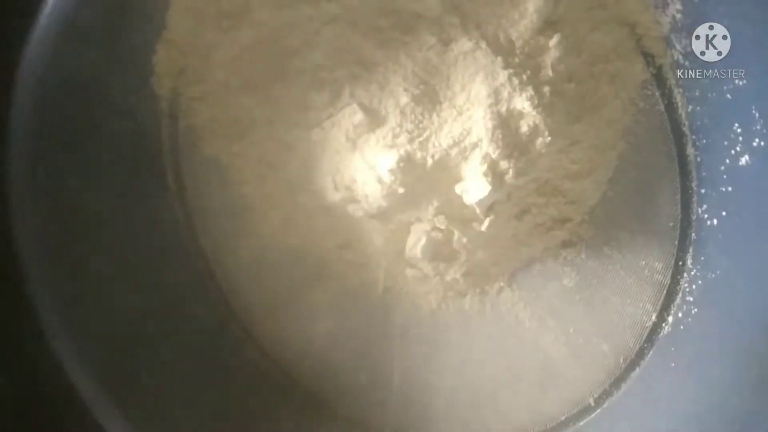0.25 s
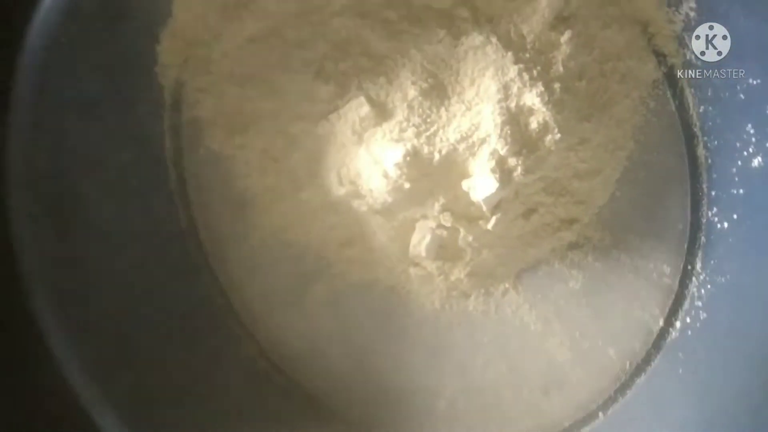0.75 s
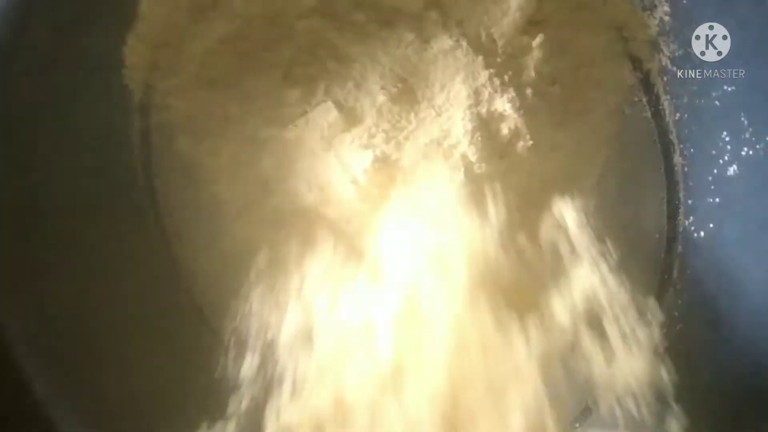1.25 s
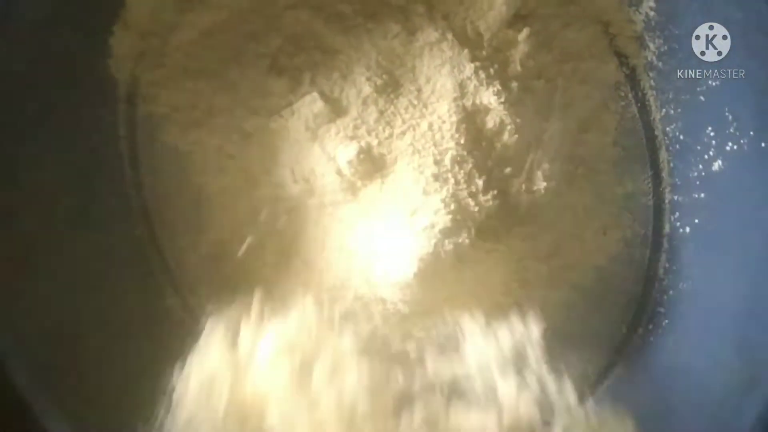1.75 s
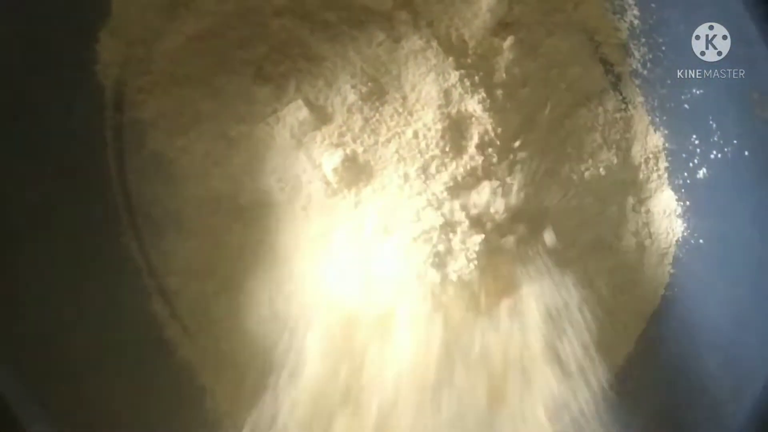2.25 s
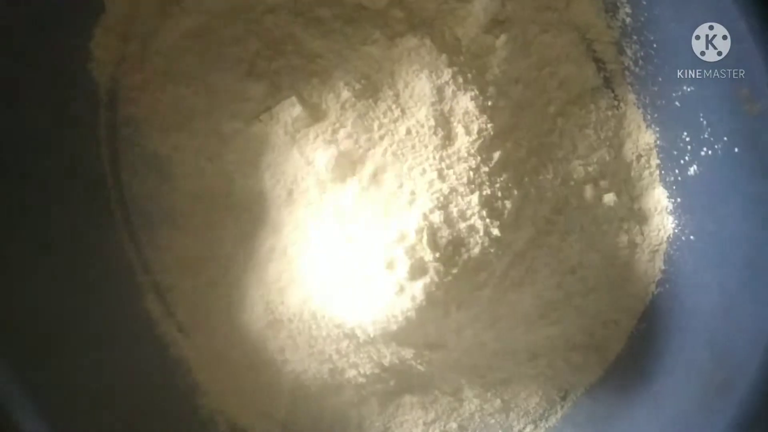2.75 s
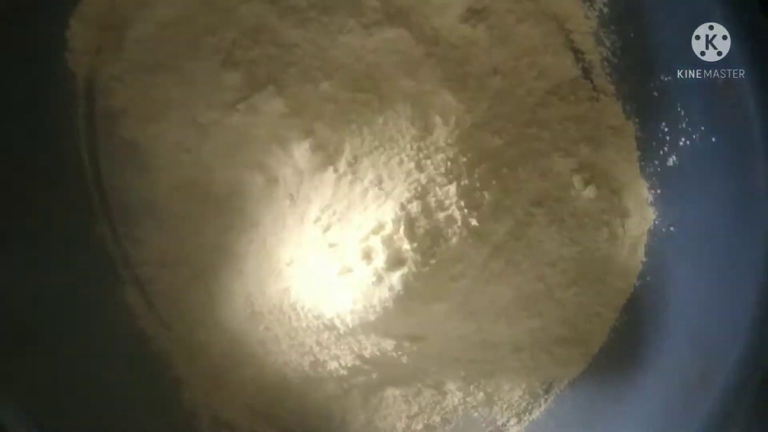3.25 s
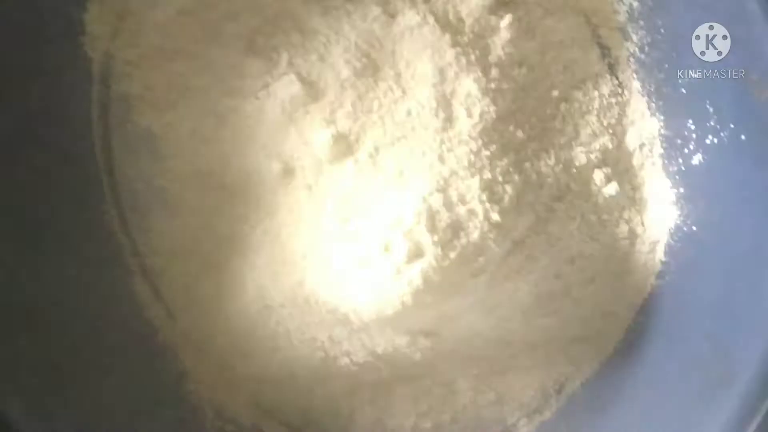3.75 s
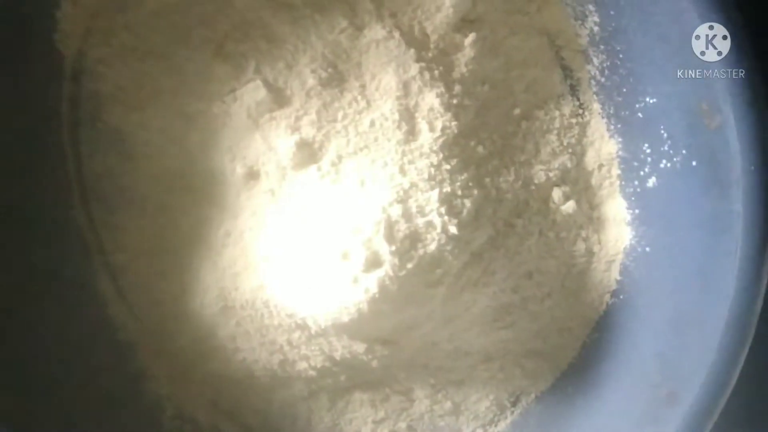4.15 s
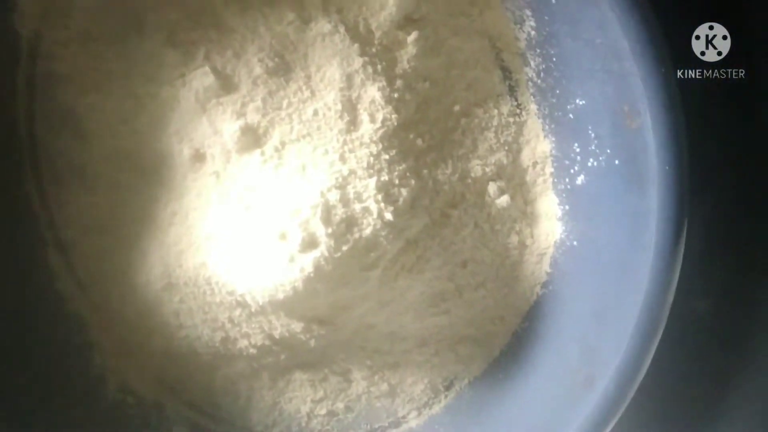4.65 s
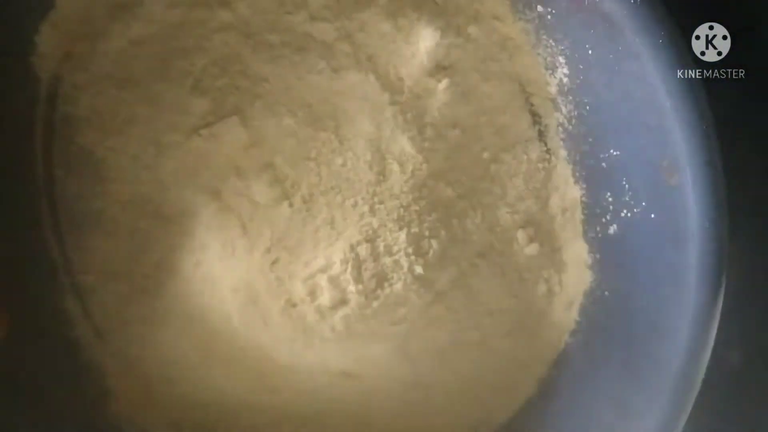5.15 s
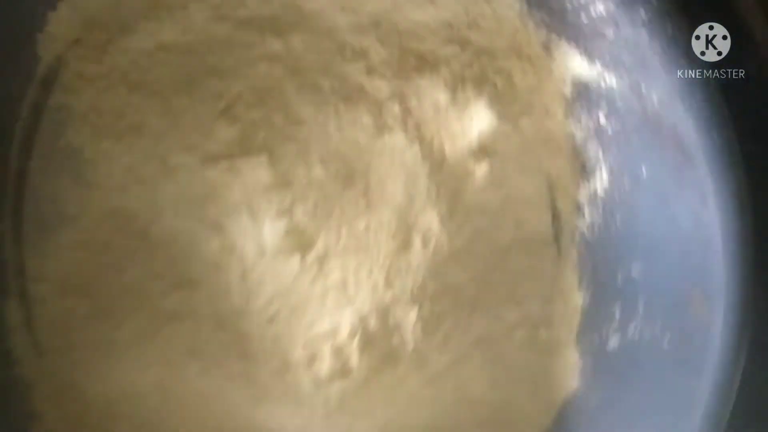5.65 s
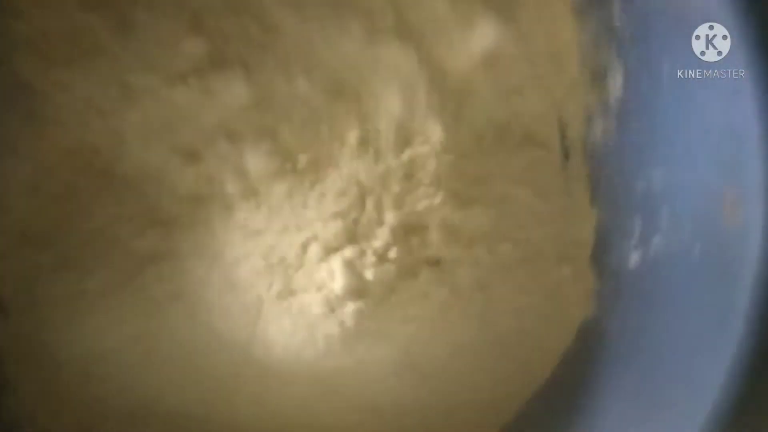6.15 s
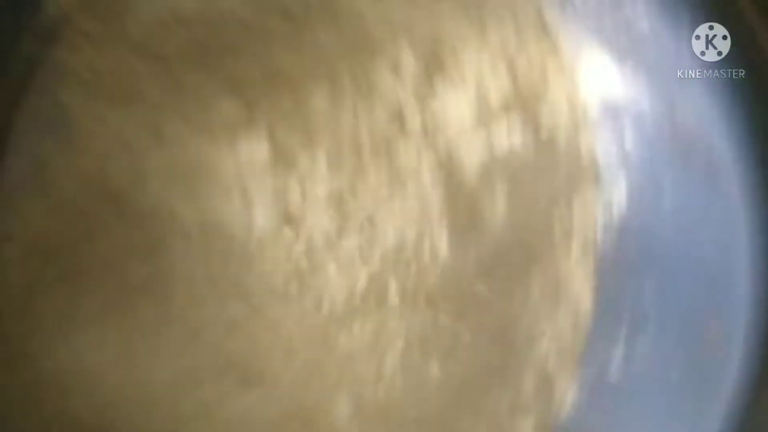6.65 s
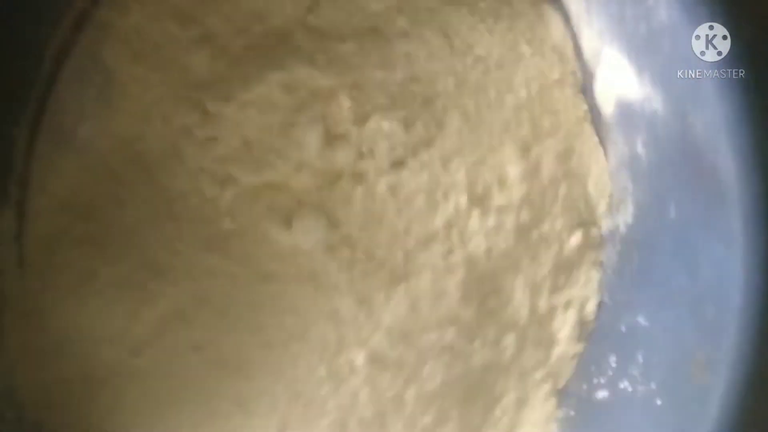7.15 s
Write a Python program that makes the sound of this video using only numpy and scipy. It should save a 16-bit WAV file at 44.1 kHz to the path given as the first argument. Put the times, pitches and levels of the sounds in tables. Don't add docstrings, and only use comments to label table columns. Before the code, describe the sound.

Close above a steel bowl in a small home kitchen, flour falls in soft, dry hissing bursts over a low fan hum. The bowl takes one loud hollow knock, stutters and scrapes along the counter, and turns. Thin metallic squeaks follow, then a sieve clunks onto the rim and rattles briefly. Finally, gentle quick shakes rustle flour through the mesh, with faint taps.

```python
import sys
import numpy as np
from scipy import signal
from scipy.fft import rfft, irfft
from scipy.io import wavfile
from scipy.ndimage import uniform_filter1d

SR = 44100
rng = np.random.default_rng(int(sys.argv[2]) if len(sys.argv) > 2 else 0)


def volts(x):
    e = np.asarray(x, float) / 20
    return 10 ** e


def int16_out(signal):
    q = np.round(np.clip(np.atleast_2d(signal).T, -1, 1) * 32767)
    wavfile.write(sys.argv[1], SR, q.astype(np.int16))


N = 326003
T = np.arange(N) / SR
HZ = np.maximum(np.fft.rfftfreq(N, 1 / SR), 1)
SIDES = np.array([[.5], [-.5]])


def unit(x):
    return x / np.sqrt(np.mean(x ** 2))


def across(table):
    hz, value = np.transpose(table)
    return np.interp(np.log(HZ), np.log(hz), value)


def walk(rate):
    k = int(SR / rate)
    held = np.repeat(rng.standard_normal(N // k + 1), k)
    return 1.33 * uniform_filter1d(uniform_filter1d(held, k), k)[:N]


def slide(s, rise, fall):
    return np.exp(-.5 * ((T - s) / np.where(T < s, rise, fall)) ** 2)


def grains(rate, scatter_db):
    k = int(SR / rate)
    sizes = volts(scatter_db * rng.exponential(size=N // k + 1))
    return np.repeat(sizes, k)[:N]


# (frequency [Hz], common share [0-1])
PORT_LIKENESS = [(60, 0.79), (300, 0.95), (500, 1), (900, 0.15), (2500, 0.22), (6000, 0.02)]


def noise(gain, lead_s, grain=1.):
    common, left, right = rfft(grain * rng.standard_normal((3, N)))
    like = np.clip(across(PORT_LIKENESS), 0, 1)
    lead = np.exp(2j * np.pi * HZ * lead_s)
    left = np.sqrt(like) * common * lead + np.sqrt(1 - like) * left
    right = np.sqrt(like) * common + np.sqrt(1 - like) * right
    return unit(irfft(np.array([left, right]) * gain, N))


def ring(x, modes):
    y = 0
    for k, (hz, db, t60) in enumerate(modes):
        pole = np.exp((2j * np.pi * hz - np.log(1000) / t60) / SR)
        y = y + (-1) ** k * volts(db) * signal.lfilter([1], [1, -pole], x).imag
    radiates = signal.butter(3, .8 * modes[0][0], "high", fs=SR, output="sos")
    return signal.sosfilt(radiates, y)


def kitchen(x, wet_db, t60):
    t = T[:int(SR * t60)]
    tail = rng.standard_normal((2, len(t))) * volts(-60 * t / t60) * (1 - np.exp(-t / 0.0023))
    tail *= volts(wet_db) / np.sqrt(np.sum(tail ** 2) / 2)
    return x + signal.fftconvolve(x, tail, axes=1)[:, :N]


def bands(table, flicker_db):
    colour = volts(across(table))
    out = 0
    for octave in np.arange(4, 14.5, .5):
        band = colour * np.sqrt(np.clip(1 - np.abs(np.log2(HZ) - octave) * 2, 0, 1))
        power = np.sum(band ** 2)
        out = out + volts(flicker_db * walk(6)) * np.sqrt(power) * noise(band, -0.00032)
    return unit(out)


# (time [s], rumble level [dB])
FAN_DRAUGHT = [(0.0, -44.5), (1.07, -43), (1.38, -42), (1.81, -43.5), (4.0, -43.5), (4.45, -43),
               (5.25, -43.5), (5.43, -40), (5.84, -43.5), (7.39, -43.5)]
# (frequency [Hz], level [dB per Hz])
FAN_RUMBLE = [(15, -83), (25, -99), (97, -37), (162, -9.5), (271, -8.5), (297, -9), (332, -7), (370, -2.5),
              (487, -7), (771, -14), (1030, -13), (1240, -15.5), (2000, -22), (2600, -66), (4400, -120)]
# (frequency [Hz], level [dB per Hz])
FAR_HISS = [(1290, -15.5), (2200, -1), (2790, -3.5), (3180, -4.5), (3420, -5), (6570, -13), (15500, -15.5)]


def room_air():
    blade_hz, width_hz, blade_db, far_db = 308.7, 10.6, -5, -10
    rumble_db = np.interp(T, *np.transpose(FAN_DRAUGHT))
    blade = noise(1 / (1 + ((HZ - blade_hz) / width_hz) ** 2), 0.)
    far = unit(noise(volts(across(FAR_HISS)), -0.000386) * volts(1.14 * walk(6.4)))
    fan = bands(FAN_RUMBLE, 0.57) + volts(blade_db) * blade
    return volts(rumble_db) * fan + volts(rumble_db + far_db) * far


# (time [s], level [dB])
COUNTER_BUMPS = [
    (1.4, -48),
    (4.68, -48),
    (5.325, -23),
    (5.515, -39),
    (7.375, -52),
]
# (frequency [Hz], level [dB], t60 [s])
COUNTER_MODES = [(30, 2, .12), (58, -10, 0.084), (96, -3, .1)]


def bumps():
    push = sum(volts(db) * slide(s, 0.0022, 0.0022) for s, db in COUNTER_BUMPS) / (0.01 * SR)
    return ring(push, COUNTER_MODES)


# (start [s], length [s], frequency [Hz], level [dB])
SQUEAK_PULSES = [(4.575, .06, 2800, -59), (4.65, .05, 2790, -58), (4.735, .022, 2905, -50),
                 (4.754, .022, 2890, -46.5), (4.776, .024, 2900, -52), (4.815, .054, 2890, -44),
                 (4.868, .034, 2915, -57), (4.902, .034, 2950, -47.5), (4.934, .024, 2950, -51),
                 (4.958, .034, 2950, -50.5), (5.0, .05, 2955, -47.5), (5.06, .02, 2920, -56),
                 (5.09, .024, 2945, -49.5), (5.115, .022, 2935, -50.5), (5.17, .025, 2940, -56),
                 (5.206, .03, 2895, -48.5), (5.238, .024, 2900, -55), (5.288, .028, 2900, -54),
                 (4.73, .6, 2915, -62)]


def squeak():
    wobble_hz, stutter_db = 16, 2.3
    start, length, hz, db = np.transpose(SQUEAK_PULSES)
    size = 0
    for s, w, d in zip(start, length, db):
        size = size + volts(d) * np.clip(1 - (2 * (T - s) / w - 1) ** 4, 0, 1)
    corners = np.ravel([start, start + length], "F")[:-2]
    pitch = np.interp(T, corners, np.repeat(hz, repeats=2)[:-2]) + wobble_hz * walk(150)
    turns = np.cumsum(pitch) / SR + np.array([[0], [.12]])
    tone = np.sin(2 * np.pi * turns) + volts(-20) * np.sin(4 * np.pi * turns)
    return size * volts(stutter_db * walk(140) + 3 * SIDES) * tone


# (frequency [Hz], level [dB], t60 [s])
CRACK_MODES = [(5500, -28, .01), (6990, 4.5, 0.018), (8670, 2, 0.026), (11200, -4, 0.0089),
               (14200, 0, .008)]


def knocks(table, base, shell, lead_s, rim_db):
    hard_contact_s, softening = .000018, 0.66
    thud, wall, crack = np.zeros((3, 2, N))
    t = T[:220]
    contact = rng.standard_normal((len(table), 3, 220))
    for (s, db, wall_db, crack_db, pan_db), burst in zip(table, contact):
        soft = np.exp(-1 / (hard_contact_s * volts(-softening * crack_db) * SR))
        for port, side in enumerate((.5, -.5)):
            i = int((s - side * lead_s) * SR)
            thud[port, i] += volts(db + side * pan_db)
            push = (t == 0) + 0.24 * burst[port] * np.exp(-t / 0.00022)
            wall[port, i:i + 220] += volts(db + wall_db) * signal.lfilter([1 - soft], [1, -soft], push)
            crack[port, i:i + 220] += volts(db + crack_db) * burst[port] * np.exp(-t / 0.001) / 4
    bare = signal.sosfilt(signal.butter(2, 3500, "high", fs=SR, output="sos"), crack)
    rim = volts(rim_db) * ring(crack, CRACK_MODES) + volts(18.0) * bare
    return ring(thud, base) + volts(-1.0) * ring(wall, shell) + rim


# (time [s], thud [dB], wall ring minus thud [dB], crack minus thud [dB],
# left minus right [dB])
BLOWS = [
    (4.0405, -27, 13.5, -4, 1),
    (4.0418, -7, -1.5, -10, -13),
    (4.0457, -7.5, -16, -12.5, -12),
    (4.0497, -31, 3, -18, 8),
    (4.128, -11.5, -14, -16, 1),
]
STUTTERS = [(4.057, -29, -3, -20, 0), (4.0685, -19, -14, -20, 0), (4.078, -22, -3, -20, 0),
            (4.088, -20, -9, -20, 0), (4.097, -25, -12, -20, 0), (4.112, -21, -11, -24, 0),
            (4.142, -28, -7, -23, 0), (4.153, -25, -10, -15, 0), (4.171, -30, -7, -17, 0),
            (4.197, -25, -14, -20, 0), (4.215, -20.5, -10, -20, 0), (4.239, -26, -10, -22, 0),
            (4.259, -27, -10, -20, 0), (4.298, -29, -8, -20, 0)]
CATCHES = [(4.447, -32, -8, -20, 3), (4.48, -24, -11, -24, 3), (4.496, -27, -14, -22, 3),
           (4.521, -22.5, -20, -24, 4.4), (4.533, -28.5, 4, -22, 5), (4.537, -21, -3.5, -20, 5.4),
           (4.547, -30, -14, -24, 3), (4.609, -30, -4, -14, 3), (4.673, -53, -2, 6, 4),
           (4.689, -48, 8, 12, 4)]
# (frequency [Hz], level [dB], t60 [s])
BLOW_MODES = [(130, -26, .1), (175, -15, .08), (250, -2, .028)]
CATCH_MODES = [(177, -10, 0.096), (259, 0, 0.042), (342, -9, 0.043), (488, -4, 0.015), (650, -5, 0.0083)]
WALL_MODES = [(650, -7, 0.024), (922, -3.5, 0.021), (1176, -2, 0.043), (1290, -6, 0.021),
              (1730, -7.5, 0.012), (2510, -2.5, 0.0039), (3300, -5.5, 0.0064)]


def bowl_knocks():
    blows = knocks(BLOWS, BLOW_MODES, WALL_MODES, 0.00046, -7.5)
    return blows + knocks(STUTTERS + CATCHES, CATCH_MODES, WALL_MODES, 0.00044, -29)


# (time [s], thud [dB], frame ring minus thud [dB], crack minus thud [dB])
SIEVE_TAPS = [(1.214, -41, -1, 2), (1.405, -55, -3, 15), (1.43, -60, -2, 8), (1.797, -34.5, -10, -30),
              (1.997, -36.5, -12, -30), (2.014, -51.5, 4, 10), (2.349, -65, 0.5, 3), (4.936, -50, 6, 0.5),
              (5.288, -35, -12, -30), (5.316, -23, -7, -24), (5.322, -22, 2, -25), (5.328, -15.5, -9, -23),
              (5.3323, -13, 4.5, -14.5), (5.3352, -26, 10, -1.5), (5.34, -34, 4, -24),
              (5.345, -19, -8, -22), (5.356, -30, 0, -25), (5.365, -30, 3, -23), (5.373, -26, -8, -29),
              (5.381, -29, -2, -25), (5.399, -31, -2, -25), (5.389, -22.5, 0.5, -20), (5.436, -25, -1, -36),
              (5.516, -28.5, -5, -1), (5.521, -30, -5, -25), (5.845, -58, 8, -6), (6.154, -53, -2, -4),
              (6.387, -56, 12, -5), (7.2149, -29, -7, -38), (7.224, -35, -14, -30),
              (7.2456, -30.5, -18, -30), (7.257, -33, -16, -30), (7.349, -36, 6, -36),
              (7.381, -37, -8, -30)]
# (frequency [Hz], level [dB], t60 [s])
SEAT_MODES = [(201.6, -7, 0.18), (311.5, -1, 0.052), (434, 3, 0.035), (578, -9.5, 0.045)]
FRAME_MODES = [(600, 0, 0.014), (857, -5.5, 0.038), (906, -7, 0.065), (1240, -5, 0.039), (1385, -5.5, .03),
               (1520, -5.5, .03), (1729, -6, 0.062), (2010, -12.5, 0.039), (2300, -7, 0.012),
               (3460, -1.5, 0.006), (3706, -8.5, 0.026), (4440, -1, 0.0034)]


def sieve_knocks():
    taps = [(*row, 1) for row in SIEVE_TAPS]
    return knocks(taps, SEAT_MODES, FRAME_MODES, -0.00028, -20)


def drag(table, base, shell, ring_db, rim_share, colour, lead_s, left_db, rim=()):
    rumble = wall = rub = 0
    for s, db, rise, fall, rim_db in table:
        speed = volts(db) * slide(s, rise, fall)
        rumble = rumble + speed
        wall = wall + volts(ring_db + rim_share * rim_db) * speed
        rub = rub + volts(rim_db) * speed
    slips = noise(1., lead_s, grains(300, 1.0))
    hiss = noise(volts(across(colour)), lead_s, grains(1500, 1.1)) * volts(left_db * SIDES)
    if rim:
        hiss = hiss + ring(hiss, rim)
    return rumble * unit(ring(slips, base)) + wall * unit(ring(slips, shell)) + rub * hiss


# (time of fastest slide [s], rumble [dB], rise [s], fall [s],
# rim hiss minus rumble [dB])
DRAGS = [
    (4.056, -27.5, 0.0047, 0.097, -8),
    (4.21, -34, 0.071, 0.039, -15.5),
    (4.3, -46, 0.026, 0.044, -11),
]
TURNS = [
    (4.36, -50.5, 0.018, 0.035, -4),
    (4.452, -47.5, 0.034, 0.039, 3),
    (4.54, -33.5, 0.034, 0.033, -19),
    (4.618, -38, 0.016, 0.01, -21),
    (4.66, -45, 0.011, 0.021, -18),
]
# (frequency [Hz], level [dB], t60 [s])
BASE_MODES = [(115.5, -21, 0.15), (179.8, -11, 0.21), (206, -0.5, 0.041), (255, 0, 0.023), (313, -12, 0.14),
              (377, -11, 0.091), (486, -7, 0.016)]
DRAG_RIM_MODES = [(5540, -35, 0.013), (7000, -31, .025), (8500, -27.5, 0.011), (11100, -34, .02),
                  (14100, -36, .015)]
TURN_RIM_MODES = [(6980, -33, .03), (8020, -29, 0.024), (9000, -34, .015), (10200, -36, .015),
                  (13400, -29, .012)]
# (frequency [Hz], level [dB per Hz])
DRAG_COLOUR = [(880, -39), (1500, -12), (2490, -23), (4460, -8.5), (4970, -13), (5490, -9.5), (6560, -13),
               (8570, -8), (9370, -9.5), (15500, -16), (16000, -63)]
TURN_COLOUR = [(1180, -38), (2000, -12), (3280, -8.5), (4260, -7), (4610, -9.5), (8120, -2), (10400, -5),
               (13600, -3.5), (16000, -2.5)]


def bowl_drags():
    dragged = drag(DRAGS, BASE_MODES, WALL_MODES, -5, 0.31, DRAG_COLOUR, 0.00028, 1.9, DRAG_RIM_MODES)
    turned = drag(TURNS, BASE_MODES, WALL_MODES, -14, .3, TURN_COLOUR, 0.00039, 13.5, TURN_RIM_MODES)
    return dragged + turned


# (time of fastest slide [s], rumble [dB], rise [s], fall [s],
# rim hiss minus rumble [dB])
SIEVE_SLIDES = [(5.162, -56, 0.0046, 0.036, 14), (5.19, -49, 0.018, 0.034, -8),
                (5.26, -61.5, 0.03, 0.041, 14), (5.355, -30, 0.023, 0.053, -14),
                (5.47, -41.5, 0.034, 0.047, -22), (5.526, -41, 0.01, 0.0082, 0),
                (5.56, -42.5, 0.015, 0.025, -12), (5.614, -39.5, 0.014, 0.022, -26),
                (7.226, -43.5, 0.031, 0.057, -14.5), (7.39, -37.5, 0.025, .02, -29)]
SHAKE_JOLTS = [
    (5.849, -55.5, 0.0084, 0.017, 16),
    (5.885, -60.5, 0.012, .015, 13.5),
    (5.915, -59, .012, .012, 13.5),
    (6.159, -59.5, .006, 0.019, 14.3),
    (6.39, -63, .006, 0.014, 14),
]
# (frequency [Hz], level [dB per Hz])
SLIDE_COLOUR = [(880, -31), (1500, -11), (1610, -21), (1740, -17), (2640, -15.5), (2910, -20),
                (14800, -27.5), (16000, -53)]
JOLT_COLOUR = [(800, -25), (1300, -0.5), (1700, -4), (2300, -3.5), (3500, -2.5), (3900, -15), (7000, -14.5),
               (16000, -25)]


def sieve_drags():
    slides = drag(SIEVE_SLIDES, SEAT_MODES, FRAME_MODES, 1, 0.5, SLIDE_COLOUR, -0.00018, 0.)
    return slides + drag(SHAKE_JOLTS, SEAT_MODES, FRAME_MODES, -2, 0.65, JOLT_COLOUR, 0., 0.)


# (time of fullest stream [s],
# hiss [dB], rise [s], fall [s], coarse rustle minus hiss [dB])
FLOUR_TIPS = [(0.03, -70, 0.045, 0.043, -10), (0.138, -56.5, 0.023, 0.036, 1), (0.885, -61, .025, .02, -7),
              (1.035, -59, 0.022, 0.023, 5), (1.11, -51, 0.043, 0.073, -10),
              (1.212, -52.5, 0.011, 0.021, 3.5), (1.27, -56, 0.033, 0.066, -12),
              (1.405, -51, .004, 0.024, -5), (1.49, -53.5, 0.042, 0.048, -12),
              (1.685, -52.5, .045, 0.025, -2.5), (1.85, -52, 0.037, 0.035, -5),
              (2.015, -57, 0.044, 0.066, -17), (2.162, -52.5, .018, 0.012, -3), (2.21, -64, .03, .07, -11),
              (2.35, -57.5, 0.0036, 0.013, -11), (2.93, -57.5, 0.063, 0.097, -6),
              (3.19, -53.5, 0.087, 0.034, -2.5), (3.27, -54.5, 0.062, 0.038, -6),
              (3.66, -65, 0.097, 0.094, -6), (4.7, -76.5, 0.23, .3, 18.5), (5.852, -51, 0.0079, 0.022, -5),
              (5.91, -62, 0.017, .013, 0), (6.159, -61, .0062, 0.019, 2), (6.19, -63, .01, 0.023, 3)]
# (time of fastest slide [s], hiss [dB], coarse rustle minus hiss [dB])
SIEVE_SHAKES = [(6.27, -65, 0), (6.37, -66, 5), (6.42, -65, 9), (6.545, -59, 7.5), (6.657, -56, -15),
                (6.773, -55, 7), (6.885, -57, -8), (6.996, -50.5, 4.5), (7.088, -56.5, -3),
                (7.215, -59.5, -1), (7.32, -58, -10)]
# (frequency [Hz], level [dB per Hz])
FINE_COLOUR = [(1180, -37), (2000, -31), (2600, -12), (4050, -6), (5390, -2.5), (7120, -3.5), (13100, 1),
               (15100, -0.5), (16000, -20.5)]
COARSE_COLOUR = [(700, -29), (1300, -2), (2200, -3), (3200, -3), (4500, -6.5), (7000, -16)]


def flour():
    swing_s = 0.019
    shakes = [(s, db, swing_s, swing_s, clump_db) for s, db, clump_db in SIEVE_SHAKES]
    fine = coarse = 0
    for s, db, rise, fall, clump_db in FLOUR_TIPS + shakes:
        stream = volts(db) * slide(s, rise, fall)
        fine = fine + stream
        coarse = coarse + volts(clump_db) * stream
    flow = volts(1.33 * walk(70))
    hiss = noise(volts(across(FINE_COLOUR)), 0., grains(2000, 1.4))
    rustle = noise(volts(across(COARSE_COLOUR)), 0.000022, grains(900, 0.69))
    return flow * (volts(4.0) * fine * hiss + coarse * rustle)


def scene():
    struck = kitchen(bowl_knocks() + sieve_knocks(), -10.0, .2)
    rubbed = kitchen(squeak() + bowl_drags() + sieve_drags() + flour(), -8.0, 0.091)
    return room_air() + bumps() + struck + rubbed


def thin(x, share, from_hz):
    mid_side = np.array([x[0] + x[1], x[0] - x[1]]) / 2
    hz, _, z = signal.stft(mid_side, SR, nperseg=2048)
    power = np.abs(z) ** 2 + 1e-30
    usual = np.exp(uniform_filter1d(np.log(power), size=41, axis=1))
    treble = power[:, hz > from_hz].sum(axis=(0, 1))
    attack = treble > 2 * np.roll(treble, shift=2)
    strong = uniform_filter1d(power, size=5, axis=1) > share * usual
    keep = strong | (hz < from_hz)[:, None] | attack
    kept = uniform_filter1d(power * keep, size=41, axis=1) / uniform_filter1d(power, size=41, axis=1)
    mid, side = signal.istft(z * keep / np.sqrt(np.clip(kept, .3, 1)), SR, nperseg=2048)[1][:, :N]
    return np.array([mid + side, mid - side])


def band_limit(x):
    return signal.sosfilt(signal.butter(12, 16630, fs=SR, output="sos"), x)


# (frequency [Hz], left minus right [dB])
PORT_BALANCE = [(100, 1.5), (300, -0.5), (700, 1.5), (1300, 0), (4000, 0.5), (8000, 4), (15000, 4.5)]


def record(dry):
    top_hz, bass_hz = 15620, 70
    tilt = volts(across(PORT_BALANCE) * SIDES) * (HZ < top_hz) / np.sqrt(1 + (bass_hz / HZ) ** 4)
    heard = irfft(rfft(np.tanh(dry)) * tilt, N)
    mix = thin(heard, share=1.35, from_hz=3100)
    return band_limit(mix)


dry = scene()
out = record(dry)
int16_out(out)
```